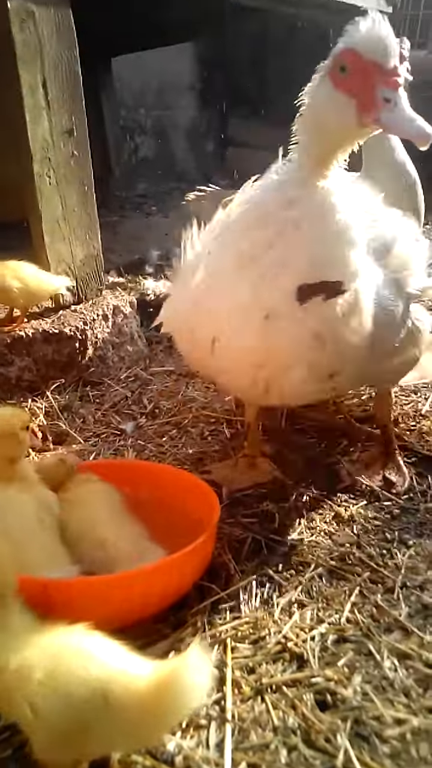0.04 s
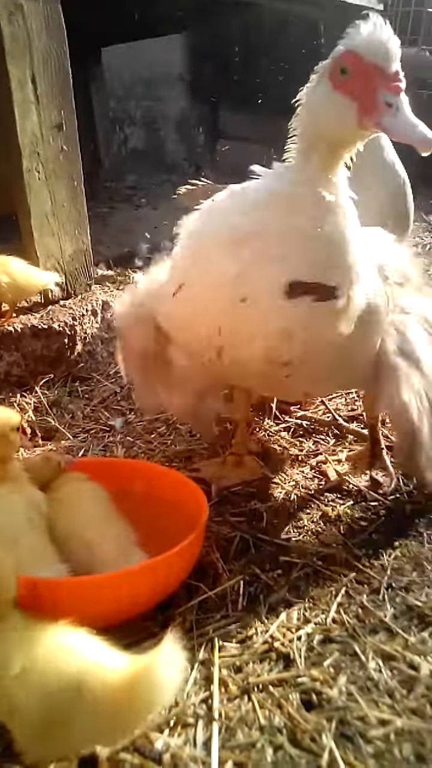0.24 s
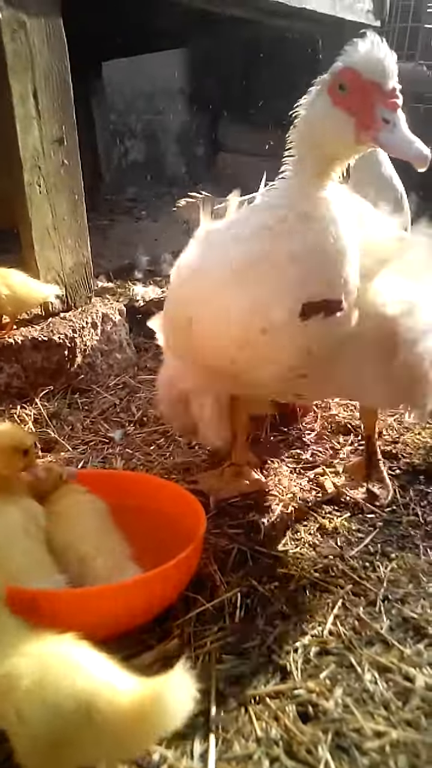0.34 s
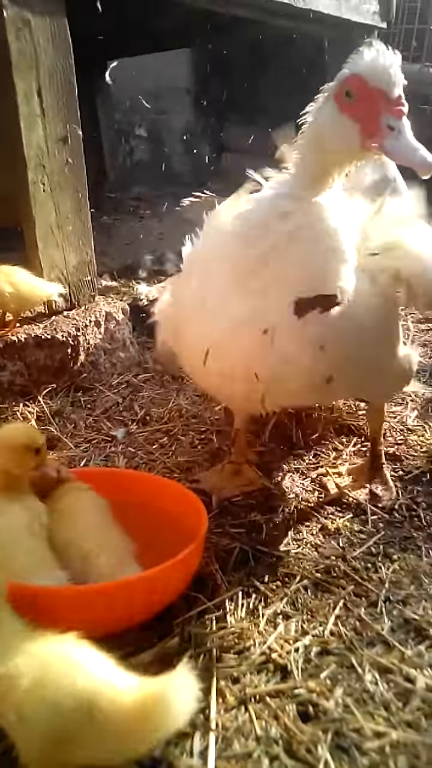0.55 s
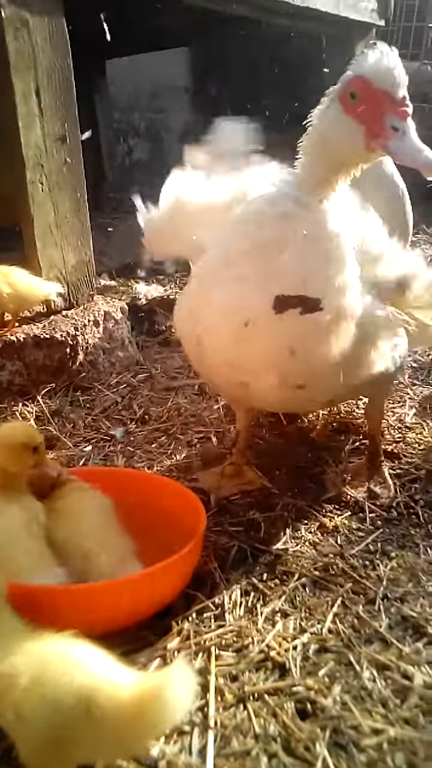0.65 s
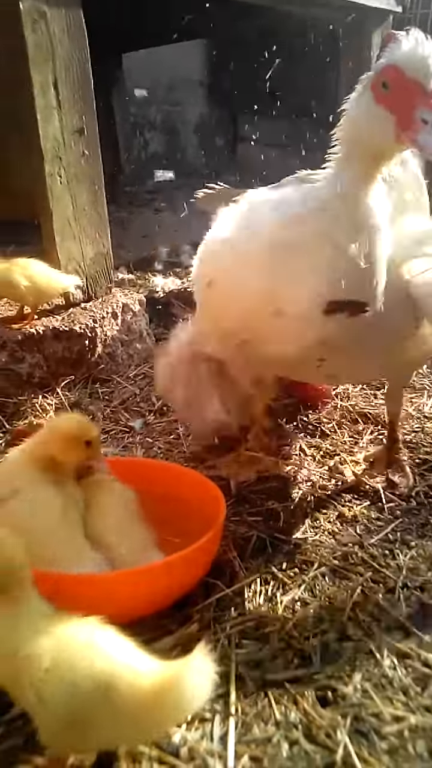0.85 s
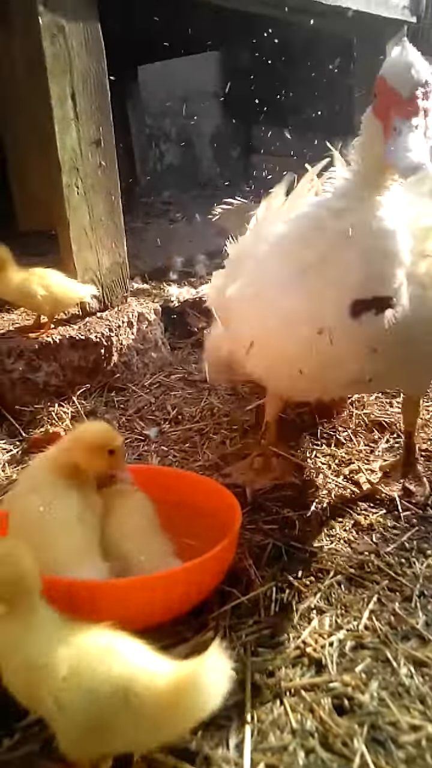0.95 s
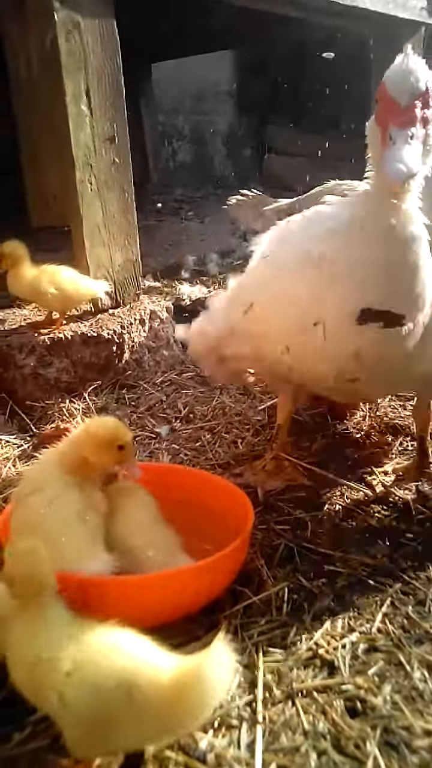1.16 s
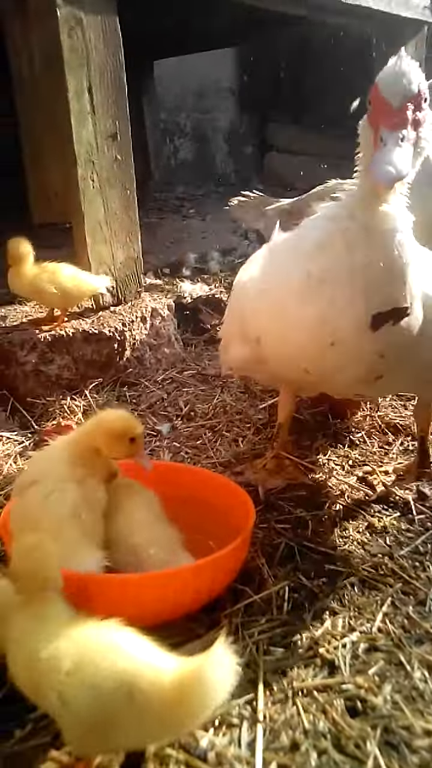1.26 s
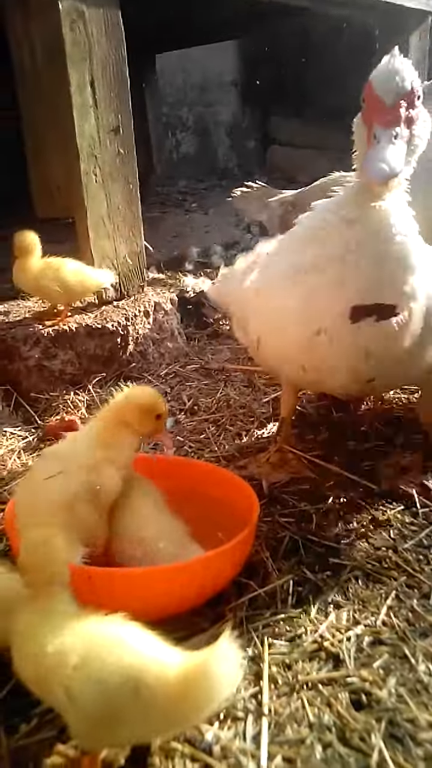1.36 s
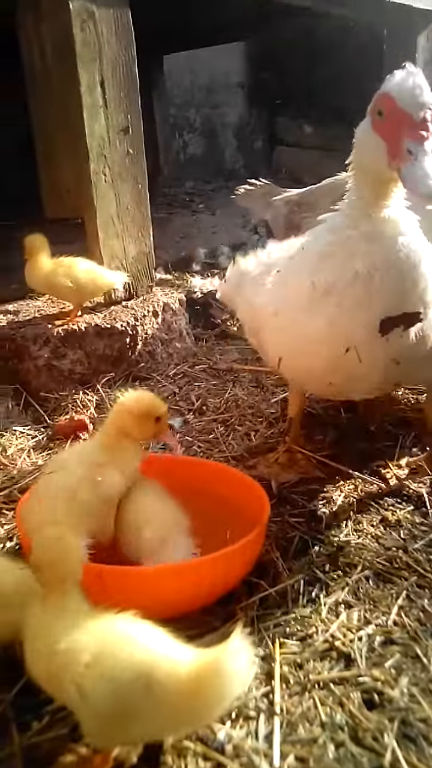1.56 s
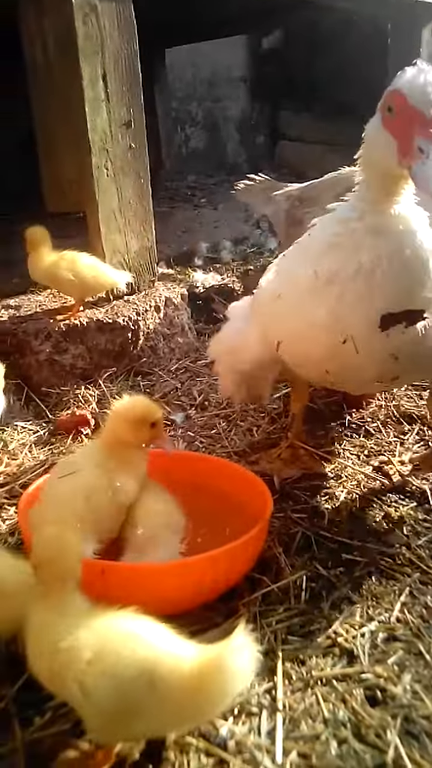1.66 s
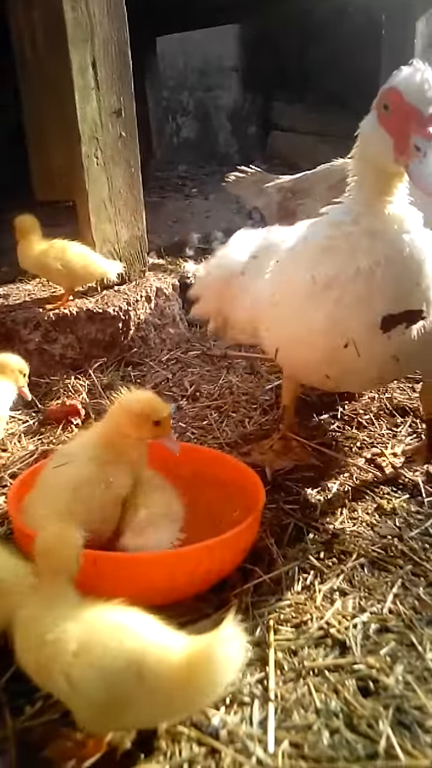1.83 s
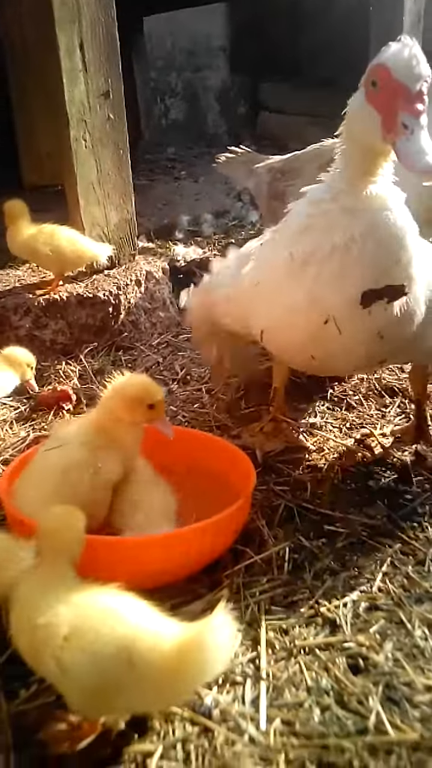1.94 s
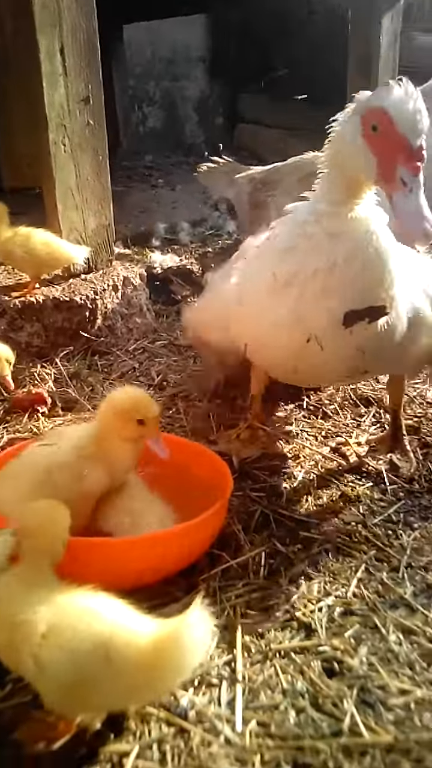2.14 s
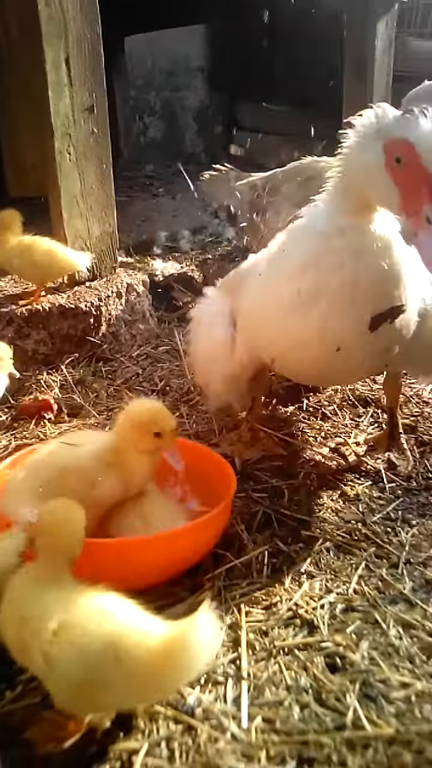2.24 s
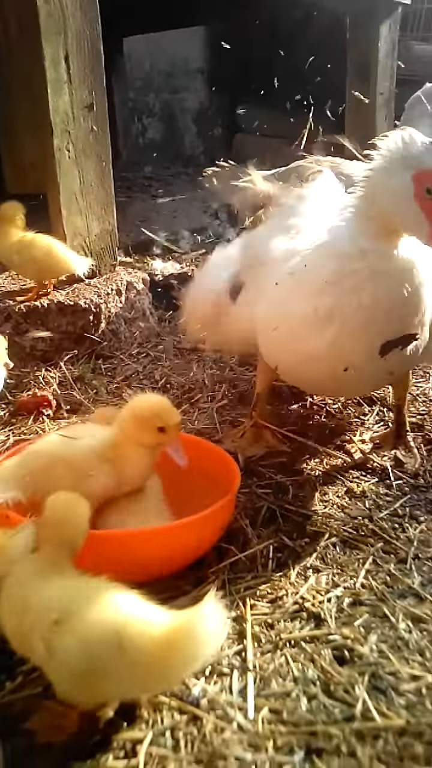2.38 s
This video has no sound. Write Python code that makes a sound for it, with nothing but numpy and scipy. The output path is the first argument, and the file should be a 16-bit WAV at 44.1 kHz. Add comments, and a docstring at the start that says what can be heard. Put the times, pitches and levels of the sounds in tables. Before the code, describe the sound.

Feathers flap, snap and rustle in a small wooden shed, with crackling straw, soft duckling chirps, tiny drips and three dry knocks.

```python
"""A big duck shakes and flicks its wings in a straw-bedded wooden shed.
Quills zip and snap, feathers rub into a rustle, the wings puff air and straws crack over soft thuds.
Ducklings sing gliding tones: falling peeps from the back, arched chirps at their bowl, where water
gulps and drips ring as tiny bubbles. Three dry, heavily damped knocks sound close by.
The boards answer with a short reverb over a faint room tone."""
import sys
import numpy as np
from scipy import signal
from scipy.fft import rfft, irfft, next_fast_len
from scipy.io import wavfile
from scipy.ndimage import uniform_filter1d, map_coordinates

SR = 44100
rng = np.random.default_rng(int(sys.argv[2]) if len(sys.argv) > 2 else 0)


def int16_out(signal):
    """Quantize to a 16-bit WAV file."""
    q = np.round(np.clip(np.atleast_2d(signal).T, -1, 1) * 32767)
    wavfile.write(sys.argv[1], SR, q.astype(np.int16))


N = 374409


def amp(db):
    """Decibels to gain."""
    return 10 ** (np.asarray(db) / 20)


def unit(x):
    """x at rms 1."""
    return x / np.sqrt(np.mean(x ** 2) + 1e-20)


def along(points, hz):
    """Read (frequency, value) breakpoints on a log frequency axis."""
    freqs, values = np.transpose(points)
    return np.interp(np.log(hz + 1), np.log(freqs), values)


def clock(length):
    """Sample times of a sound lasting length seconds."""
    return np.arange(int(length * SR)) / SR


def add(track, s, sound):
    """Mix a sound into the track at time s."""
    part = track[max(round(s * SR), 0):][:len(sound)]
    part += sound[:len(part)]


def filtered(x, response):
    """x through an EQ given as a function of frequency."""
    size = next_fast_len(len(x) + 4096)
    return irfft(rfft(x, size) * response(np.fft.rfftfreq(size, 1 / SR)), size)[:len(x)]


def coloured(x, spectrum):
    """x through a breakpoint EQ, at rms 1."""
    return unit(filtered(x, lambda hz: amp(along(spectrum, hz))))


def noise(samples, spectrum):
    """Noise with this spectrum, at rms 1."""
    return coloured(rng.standard_normal(samples), spectrum)


def resonance(hz, centre, width):
    """Causal response of one damped mode."""
    return 1j * hz * width / (centre ** 2 - hz ** 2 + 1j * hz * width)


def wobble(rate):
    """A smooth random modulator, rate knots a second."""
    return map_coordinates(rng.standard_normal(int(N * rate / SR) + 4), [np.arange(N) * rate / SR])


def burst(t, rise, t60):
    """An envelope with a quick attack and an exponential decay, peaking at 1."""
    shape = (1 - np.exp(-t / rise)) * amp(-60 * t / t60)
    return shape / shape.max()


def swells(times, levels_db, rise_db_per_s, fall_db_per_s):
    """A gain that swells up to each cue and dies away after it."""
    t = np.linspace(0, N / SR, N // 32)
    since = t - times[:, None]
    level = levels_db[:, None] - np.maximum(-since * rise_db_per_s, since * fall_db_per_s)
    return amp(np.interp(np.arange(N) / SR, t, level.max(axis=0)))


def glides(rows, waver, overtone_db):
    """Nearly pure tones that bend through a few pitches: rows (time, length, pitches..., level)."""
    out, unsteady = np.zeros(N), wobble(600)
    for s, length, *pitches, db in rows:
        progress = clock(length) / length
        bend = np.polyfit(np.linspace(0, 1, len(pitches)), pitches, len(pitches) - 1)
        jitter = 1 + waver * unsteady[int(s * SR):][:len(progress)]
        phase = 2 * np.pi * np.cumsum(np.polyval(bend, progress) * jitter) / SR
        tone = np.sin(phase) + amp(overtone_db) * np.sin(2 * phase)
        add(out, s, amp(db) * np.sqrt(np.sin(np.pi * progress)) * tone)
    return out


HARD_DB = -19  # a flick above this level is a full wingbeat
# EQs of a flick's mid snap, airy quill hiss and low thump: (frequency [Hz], level [dB])
SNAP_EQ = [(100, -33.5), (380, -13), (520, -16.5), (900, -0.5), (1700, -4), (2500, 4), (3300, 1),
           (4500, -10), (6500, -23), (8500, -26), (11000, -44)]
QUILL_EQ = [(2000, -38), (5000, 1), (8000, -4), (10500, 2), (13000, 2.5), (15500, 2)]
THUMP_EQ = [(30, -30), (80, -7), (170, 1), (270, -9), (350, 3), (420, 1.5), (550, -12), (1000, -11.5),
            (3000, -69.5)]
# wing flicks, in flurries: (time [s], snap level [dB], hiss level [dB], thump level [dB])
FLICKS = [(0.002, -31.5, -50.5, -78), (0.144, -29, -48, -56), (0.273, -24, -42, -60),
          (0.398, -26, -45.5, -47.5), (0.531, -26, -41, -48), (0.657, -19.5, -37.5, -47),
          (0.781, -18.5, -39, -45), (0.895, -21.5, -45, -54), (0.915, -21.5, -40.5, -42),
          (1.042, -16, -41.5, -42), (1.177, -24, -46, -60), (1.324, -26, -48.5, -57),
          (1.481, -41.5, -57, -83), (1.675, -48, -61, -80), (2.269, -42, -62.5, -66),
          (2.437, -37, -44, -67), (2.571, -32.5, -51, -63), (2.718, -35, -42.5, -67),
          (2.812, -29, -57, -56), (2.931, -20, -42.5, -62), (2.983, -25, -43, -67), (3.051, -26, -51, -55),
          (3.105, -18.5, -45.5, -36.5), (3.228, -14.5, -41.5, -35), (3.362, -17, -40.5, -37),
          (3.494, -16.5, -41, -44), (3.649, -19, -41, -46), (3.834, -26.5, -43, -62),
          (4.014, -39, -57.5, -63), (4.201, -41, -59, -63), (4.452, -38, -67, -60.5),
          (4.557, -34.5, -47, -81), (4.728, -31.5, -44, -79), (4.892, -29, -46.5, -73),
          (5.058, -27.5, -47, -77), (5.217, -26, -42.5, -64), (5.829, -26, -50.5, -68),
          (5.989, -30, -58, -61), (6.142, -29.5, -55, -64), (6.336, -30.5, -55, -74),
          (6.527, -37, -54, -78), (7.482, -43, -58.5, -70), (8.477, -27, -58, -71)]


def wing_flicks(snap_delay_s=0.0015, lead_s=0.015):
    """Each flick zips the quills past each other: a brief swish, a snap, a hiss and a puff of air."""
    out, t = np.zeros(N), clock(0.1)
    for s, db, hiss_db, thump_db in FLICKS:
        tilt_db_per_octave = 0.13 * (hiss_db + 47)  # a harder zip is brighter
        hiss_eq = [(hz, level + tilt_db_per_octave * max(np.log2(hz / 7000), 0))
                   for hz, level in QUILL_EQ]
        barbs, quills, air = (noise(len(t), eq) for eq in (SNAP_EQ, hiss_eq, THUMP_EQ))
        snap = amp(db - 23.5) * unit(barbs * burst(t, rise=0.00089, t60=0.02))
        hiss = amp(hiss_db - 12.5) * unit(quills * burst(t, rise=0.00092, t60=0.017))
        push_db = 0.5 * max(db - HARD_DB, 0)  # hard beats push disproportionately more air
        thump = amp(thump_db + push_db - 11) * unit(air * burst(t, rise=0.00078, t60=0.045))
        add(out, s + snap_delay_s, snap + hiss + thump)
        if db > HARD_DB:  # the leading feathers let go early
            add(out, s - lead_s, amp(-12.5) * (snap + hiss))
        # the feathers start to slide just before they let go
        fade_in = amp(-22 - 60 * t[::-1] / 0.033)
        swish = (amp(db - 11.5) * barbs + amp(hiss_db - 4) * quills) * fade_in
        add(out, max(s - len(t) / SR, 0), swish[-max(int(s * SR), 1):])
    return out


def rubbing(spectrum, slips_per_s, spread_db, floor, t60, patchy_db=2.5):
    """Noise that flares with every tiny slip; each band flutters as different feathers touch."""
    onsets = rng.random(N) < slips_per_s / SR
    slips = onsets * amp(spread_db * np.minimum(rng.exponential(size=N), 3))
    energy = signal.fftconvolve(slips ** 2, burst(clock(0.03), rise=0.00072, t60=t60))[:N]
    contact = unit(np.sqrt(np.abs(energy)))
    friction = coloured((floor + contact) * rng.standard_normal(N), spectrum)
    bands = signal.stft(friction, nperseg=256)[2]
    patches = uniform_filter1d(rng.standard_normal(bands.shape), size=5, axis=0)
    patches = unit(uniform_filter1d(patches, size=5, axis=1))
    return unit(signal.istft(bands * amp(patchy_db * patches), nperseg=256)[1][:N])


# EQs of rubbing feathers and of the low boom of moving air: (frequency [Hz], level [dB])
FEATHER_EQ = [(100, -36.5), (200, -5), (290, -21), (390, -7.5), (520, -7), (750, -1), (1030, 2.5),
              (1550, -6), (2000, -2.5), (2550, 2), (3400, -3.5), (5000, -15), (6500, -22.5), (8500, -33.5)]
AIR_EQ = [(25, -27.5), (45, -24.5), (70, -14.5), (105, 0), (145, 2.5), (200, -2.5), (270, -14),
          (400, -18.5), (700, -43), (2000, -81.5)]
# fader ride for how hard the duck shakes: (time [s], level [dB])
SHAKE = [(0.0, -55), (0.52, -49.5), (0.99, -49), (1.15, -49.5), (1.36, -63), (1.81, -62), (2.07, -67),
         (2.28, -66.5), (2.52, -60), (3.29, -49.5), (3.53, -51.5), (4.14, -65.5), (4.38, -66.5),
         (5.25, -60.5), (5.6, -63), (6.0, -56.5), (6.26, -66.5), (6.78, -63), (7.2, -68), (7.63, -71.5),
         (7.79, -69.5), (8.45, -86)]


def feather_rustle(full_shake_db=-49.5):
    """Feathers rub and the wings push air about: both follow the shaking and swell at each flick."""
    shake_db = np.interp(np.arange(N) / SR, *np.transpose(SHAKE))
    effort_db = shake_db - full_shake_db
    times, db, hiss_db, _ = np.transpose(FLICKS)
    stroke = swells(times, db - HARD_DB, rise_db_per_s=900, fall_db_per_s=303)
    settling = swells(times, hiss_db, rise_db_per_s=900.5, fall_db_per_s=329)
    draught = swells(times, 1.39 * (db - HARD_DB), rise_db_per_s=267.5, fall_db_per_s=302)
    flutter = amp(1.4 * wobble(60))
    feathers = flutter * rubbing(FEATHER_EQ, slips_per_s=300, spread_db=5, floor=0.71, t60=0.019)
    barbs = rubbing(QUILL_EQ, slips_per_s=90, spread_db=6, floor=0.4, t60=0.012)
    air = noise(N, AIR_EQ) * amp(2.1 * wobble(25))
    return (np.hypot(amp(shake_db + 2), amp(-44) * stroke) * feathers
            + np.hypot(amp(-76 + 3.4 * effort_db), amp(-24.5) * settling) * barbs
            + np.hypot(amp(-59 + 1.33 * effort_db), amp(-54.5) * draught) * air)


# pitch envelope of a peep, evenly spaced points: (share of the base pitch [ratio])
PEEP_SHAPE = [0.95, 0.96, .8, .75]
# peeps from the back of the shed: (time [s], length [s], base pitch [Hz], level [dB])
PEEPS = [(0.0, 0.032, 4220, -39.5), (.145, 0.1, 4100, -45.5), (0.95, 0.081, 4260, -42.5),
         (1.227, 0.1, 4150, -45), (1.744, .09, 4220, -42), (2.458, 0.068, 4120, -44),
         (2.645, .08, 4426, -42), (4.557, .083, 4060, -48.5), (6.28, 0.15, 4050, -52),
         (6.946, 0.092, 4180, -49.5), (7.779, .12, 4120, -51.5)]


def duckling_peeps():
    """A thin call that holds its pitch, then drops; each a little higher or lower, longer or shorter."""
    rows = [(s, length, *(hz * np.array(PEEP_SHAPE)), db) for s, length, hz, db in PEEPS]
    return glides(rows, waver=0.025, overtone_db=-51.5)


# reverb time of the wooden shed: (frequency [Hz], t60 [s])
SHED_DECAY = [(150, 0.32), (1000, 0.085), (3500, 0.087), (8000, 0.12), (15000, 0.065)]


def shed_reverb(x, stretch=1, sections=12, attack_s=0.0043):
    """The boards answer, each band dying at its own speed."""
    out, edges = np.zeros(N), np.linspace(0, N, sections + 1).astype(int)
    for start, end in zip(edges, edges[1:]):
        # a fresh random tail for each section keeps the reverb from ringing at fixed pitches
        hz, t, bands = signal.stft(rng.standard_normal(SR // 2), SR, nperseg=256)
        t60 = stretch * along(SHED_DECAY, hz)[:, None]
        tail = signal.istft(bands * amp(-60 * t / t60), SR, nperseg=256)[1]
        tail *= np.clip(np.arange(len(tail)) / SR / attack_s, 0, 1) ** 2
        add(out, start / SR, signal.fftconvolve(x[start:end], tail / np.linalg.norm(tail)))
    return out


# EQ of the shed's background: (frequency [Hz], level [dB])
ROOM_TONE_EQ = [(15, -52), (25, -19), (123, 5.5), (285, -7.5), (463, -8), (840, -16), (962, -3),
                (1560, -11.5), (2610, -8.5), (3160, -8), (4610, -14.5), (6380, -17.5), (8140, -31),
                (14800, -33), (16000, -45.5)]


def room_tone():
    """A faint, steady bed of dark noise."""
    return amp(-68) * noise(N, ROOM_TONE_EQ)


def cracks(rows, relative_width=0.63):
    """A straw or feather cracks in one broad resonance: rows (time, level, pitch)."""
    out, t = np.zeros(N), clock(0.017)
    envelope = burst(t, rise=0.0015, t60=0.026)
    for s, db, pitch_hz in rows:
        body = lambda hz: resonance(hz, pitch_hz, relative_width * pitch_hz) / (1 + (hz / 4600) ** 6)
        crack = unit(filtered(rng.standard_normal(len(t)), body) * envelope)
        hiss = unit(noise(len(t), QUILL_EQ) * envelope)
        hiss_db = -69 + 2.1 * (db - HARD_DB)  # hard cracks carry a trace of hiss
        add(out, s, amp(db - 25.5) * crack + amp(hiss_db) * hiss)
    return out


def back_strokes(return_share=0.45, quickest_beat_s=0.1, slowest_beat_s=0.16):
    """The wing swings back, if the next flick leaves it time, and cracks softly against the body."""
    times, db, _, _ = np.transpose(FLICKS)
    force_db = db - HARD_DB
    gap = np.diff(times, append=N / SR)
    late, detune = rng.standard_normal((len(times), 2)).T
    when = times + return_share * np.minimum(gap, slowest_beat_s) + 0.002 * late
    pitch_hz = 1390 * 2 ** (0.07 * force_db + 0.43 * detune)  # duller after a gentle flick
    rows = np.column_stack([when, -26 + 0.63 * force_db, pitch_hz])
    return cracks(rows[gap > quickest_beat_s], relative_width=0.67)


# soft low thuds, from wingbeats and perhaps padding feet: (time [s], level [dB])
LOW_THUDS = [(.1, -48), (.78, -41), (.92, -44), (1.04, -47), (1.16, -45.5), (1.63, -59.5), (2.97, -48),
             (3.11, -41), (4.08, -53.5), (4.2, -56.5), (4.65, -64), (5.14, -54), (5.27, -54), (5.44, -53.5),
             (5.65, -52), (5.8, -56), (6.64, -53), (7.43, -59)]


def low_thuds():
    """Soft, dull bumps that only stir the low boom of the shed."""
    envelope = swells(*np.transpose(LOW_THUDS), rise_db_per_s=395, fall_db_per_s=200.5)
    return amp(-4) * envelope * noise(N, AIR_EQ)


def stray_straws(per_s=8.9, centre_hz=1400, scatter_octaves=0.54):
    """Straws give way faintly at random, louder the harder the duck shakes."""
    place, accent, detune = rng.uniform(-1, 1, (int(per_s * N / SR), 3)).T
    times = np.abs(place) * N / SR
    db = np.interp(times, *np.transpose(SHAKE)) + 7.5 + 3 * accent
    return cracks(zip(times, db, centre_hz * 2 ** (scatter_octaves * detune)))


# foreground straw and feather cracks: (time [s], level [dB], pitch [Hz])
ACCENT_CRACKS = [(0.349, -15.5, 2170), (0.436, -19, 1030), (0.478, -16.5, 2520), (0.61, -16.5, 1030),
                 (0.739, -27, 921), (0.838, -25, 2160), (0.961, -16.5, 980), (1.157, -15.5, 1890),
                 (2.374, -27.5, 1030), (2.806, -19, 2910), (3.069, -12.5, 2420), (3.625, -18.5, 1900),
                 (4.029, -18.5, 2500), (4.166, -29, 3020), (5.158, -28, 980), (5.199, -34, 1600),
                 (5.284, -25.5, 700), (5.44, -29.5, 796), (5.491, -32, 970), (5.783, -20, 2160),
                 (5.806, -24, 770), (5.882, -24, 645), (6.204, -27.5, 810), (6.979, -29.5, 2700),
                 (7.687, -31, 2580), (8.465, -29.5, 1960), (8.477, -28, 1010)]


def accent_cracks():
    """Single straws and feathers crack hard enough to cut through the rustle."""
    return cracks(ACCENT_CRACKS)


# gulps: (time [s], length [s], start pitch [Hz], middle pitch [Hz], end pitch [Hz], level [dB])
GULPS = [(1.800, 0.017, 550, 520, 486, -39.5), (1.815, 0.034, 516, 695, 1090, -40),
         (1.922, 0.015, 1040, 910, 740, -46), (2.638, 0.02, 766, 690, 680, -42)]


def water_gulps():
    """Water gulps under a duckling in short, low, bending blips."""
    return glides(GULPS, waver=0.055, overtone_db=-19.5)


# chirps at the bowl: (time [s], length [s], top pitch [Hz], share of the arch sung [ratio], level [dB])
CHIRPS = [(2.136, .044, 2850, 1, -44), (2.252, .046, 2920, 1, -45), (2.427, .03, 3060, 1, -43),
          (3.558, .054, 2890, 1, -45), (6.42, .05, 2800, 1, -47), (6.566, .048, 2820, 1, -48),
          (6.79, .04, 2200, .6, -56), (6.858, .037, 2950, .6, -49), (6.91, .03, 3080, .5, -48),
          (6.987, .025, 2880, .5, -50)]


def duckling_chirps(sag=0.163, rough_db=1.5):
    """Each soft chirp climbs an arch of pitch and comes down again, unless it breaks off early."""
    rows = []
    for s, length, top_hz, share, db in CHIRPS:
        progress = np.array([0, share / 2, share])
        arch = 1 - sag * (2 * progress - 1) ** 2
        rows.append((s, length, *(top_hz * arch), db))
    return glides(rows, waver=0.032, overtone_db=-38) * amp(rough_db * wobble(250))


# resonant body of a knock: (frequency [Hz], bandwidth [Hz], level [dB])
KNOCK_MODES = [(700, 260, 5.5), (1172, 910, 19), (4350, 670, -0.5)]
# close, dry knocks: (time [s], peak level [dB], brightness [Hz])
KNOCKS = [(2.607, -6, 5500), (2.7630, -20, 2560), (7.3302, -10, 2770)]


def dry_knocks(top_hz=5270):
    """One hard contact each, so damped that it swings little more than once."""
    def response(hz, bright_hz):
        body = sum(amp(db) * resonance(hz, centre, width) for centre, width, db in KNOCK_MODES)
        contact = 1 / (1 + 1j * hz / bright_hz) ** 3
        low_cut = 1j * hz / (380 + 1j * hz)
        notch = 1 - resonance(hz, centre=3480, width=620)  # a gap between the modes
        high_cut = 1 / (1 + 1j * hz / top_hz - (hz / top_hz) ** 2)
        return body * contact * low_cut * notch * high_cut

    out, impulse = np.zeros(N), signal.unit_impulse(int(0.03 * SR))
    for s, db, bright_hz in KNOCKS:
        knock = filtered(impulse, lambda hz: response(hz, bright_hz))
        add(out, s, amp(db) * knock / np.abs(knock).max())
    return out


# drips in the bowl: (time [s], level [dB], pitch [Hz], t60 [s])
DRIPS = [(3.126, -25, 3090, 0.031), (3.747, -44, 1850, 0.017), (3.767, -40, 2230, .03),
         (3.777, -37, 2830, 0.02), (3.939, -38.5, 3055, 0.033), (4.0575, -32.5, 2700, 0.025),
         (4.1087, -24.5, 2820, 0.013), (8.055, -50.5, 3420, 0.012), (8.121, -55, 1910, 0.039),
         (8.312, -49, 2255, 0.053), (8.314, -48, 1750, 0.043)]


def water_drips(splash_db=-11, top_hz=4800):
    """Each drop lands with a tiny splash and traps a bubble that rings briefly."""
    out, t = np.zeros(N), clock(0.05)
    for s, db, pitch_hz, t60 in DRIPS:
        band = lambda hz: resonance(hz, pitch_hz, pitch_hz / 2) ** 2
        splash = amp(splash_db) * unit(filtered(rng.standard_normal(len(t)), band))
        bubble = np.sin(2 * np.pi * pitch_hz * t)
        add(out, s, amp(db) * (bubble + splash) * burst(t, rise=0.0002, t60=t60))
    return filtered(out, lambda hz: 1 / (1 + (hz / top_hz) ** 8))


def scene():
    """The mono mix: near sounds are mostly direct; the far peeps arrive mostly by the walls."""
    duck = wing_flicks() + accent_cracks() + back_strokes() + stray_straws()
    bowl = water_drips() + water_gulps() + amp(-0.5) * duckling_chirps()
    peeps = duckling_peeps()
    knocks = dry_knocks()
    reverb = shed_reverb(amp(-10) * duck + amp(-13.5) * bowl + amp(-40.5) * knocks)
    # a faint hollow ring hangs in the shed after each flick
    ring = amp(9) * filtered(reverb, lambda hz: resonance(hz, centre=980, width=60))
    bed = room_tone()
    far_peeps = amp(-4) * (shed_reverb(peeps, stretch=2.6) + amp(-9) * peeps)
    near = duck + bowl + knocks + feather_rustle() + low_thuds()
    return (near + reverb + ring + far_peeps + bed)[None]


def record(dry):
    """A steep high cut on the master."""
    top_hz = 15800
    return np.array([filtered(channel, lambda hz: 1 / (1 + (hz / top_hz) ** 120)) for channel in dry])


dry = scene()
out = record(dry)
int16_out(out)
```